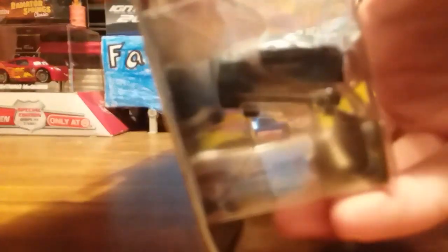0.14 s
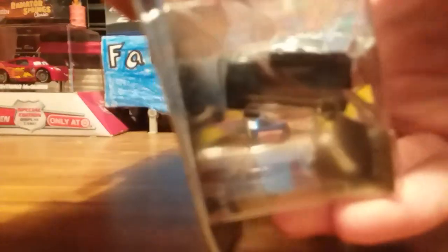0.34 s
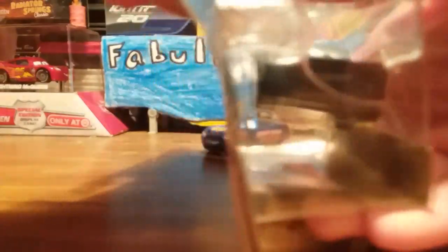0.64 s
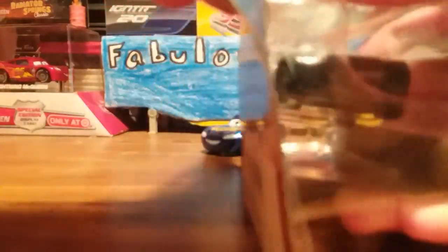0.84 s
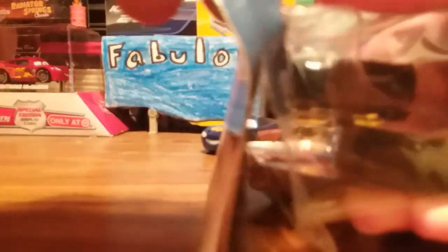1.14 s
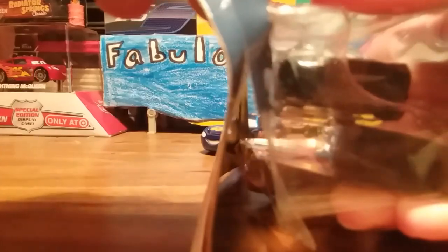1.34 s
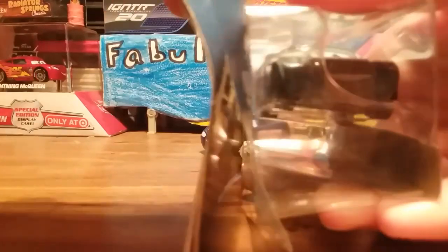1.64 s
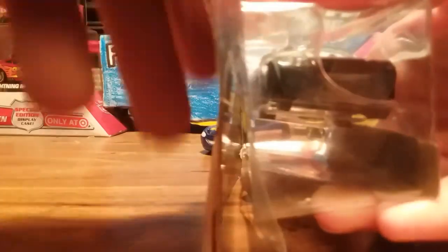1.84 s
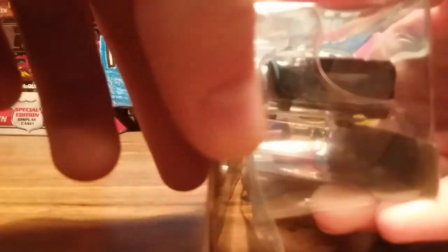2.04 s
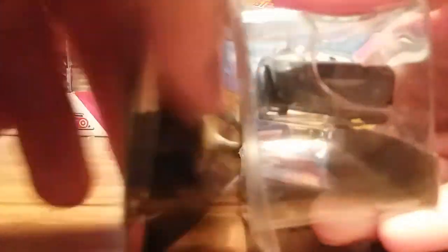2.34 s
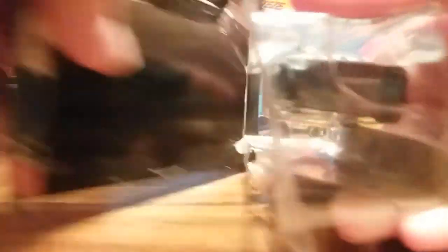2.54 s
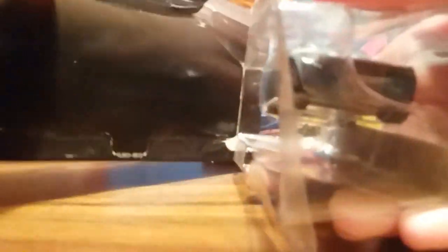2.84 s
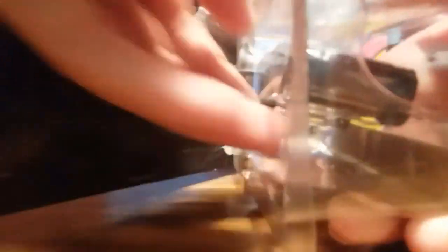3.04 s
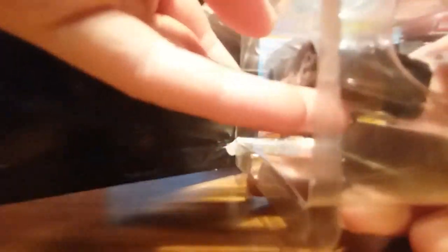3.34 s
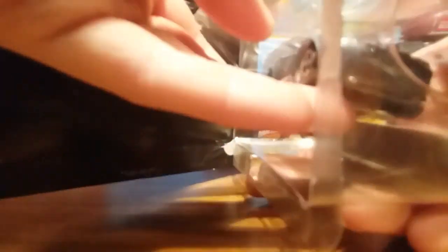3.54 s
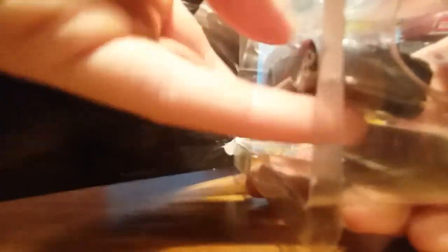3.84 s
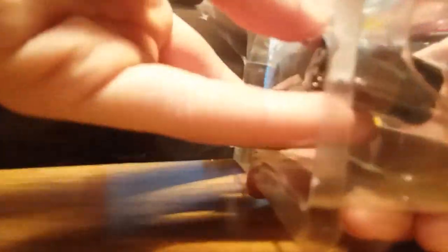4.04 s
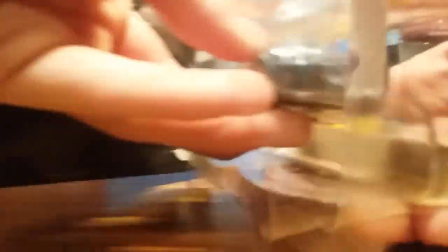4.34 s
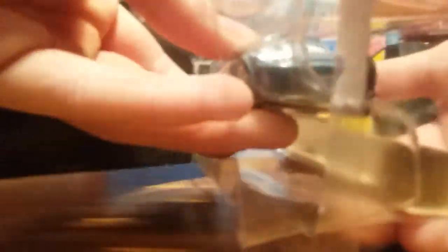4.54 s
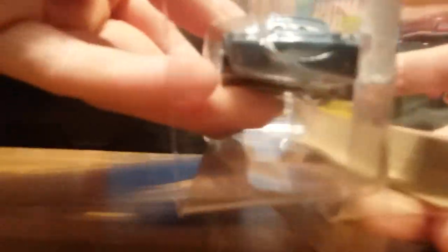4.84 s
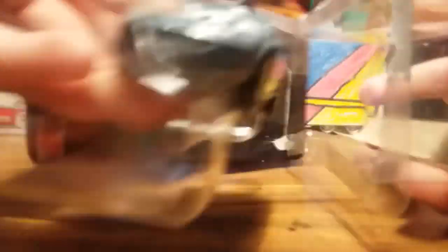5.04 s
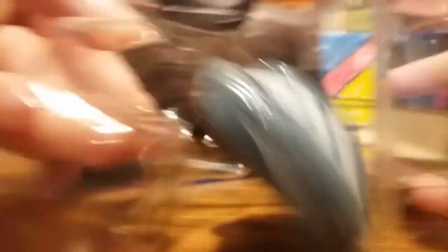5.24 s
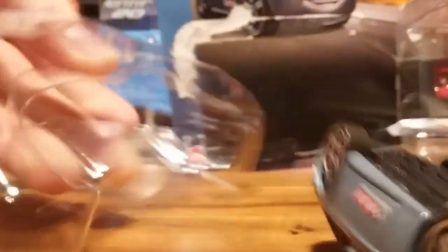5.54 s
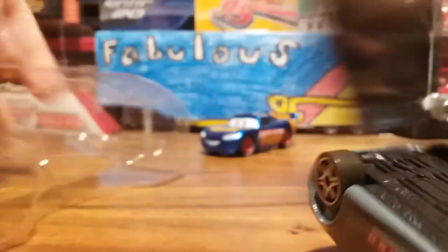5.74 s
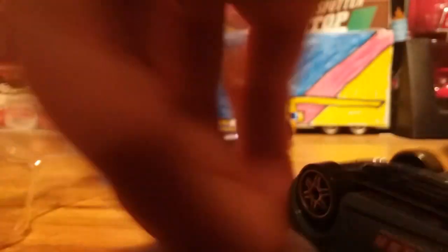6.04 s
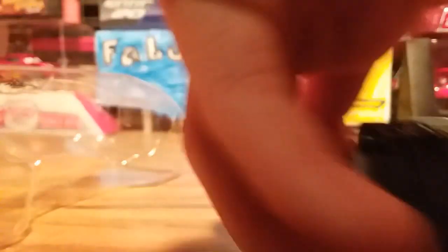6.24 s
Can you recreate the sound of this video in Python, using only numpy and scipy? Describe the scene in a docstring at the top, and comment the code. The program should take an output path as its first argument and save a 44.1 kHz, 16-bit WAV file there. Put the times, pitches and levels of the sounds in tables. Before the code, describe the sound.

Very close to a stereo microphone in a small quiet room, hands pry a stiff plastic shell from its card. Separate hollow snaps come first, then a cluster of hard pops with a tearing rasp and small squeak, a sparser stretch of light ticks, and finally a dense rattling, crinkling burst with soft table thumps before it goes quiet.

```python
"""Prying open a plastic blister pack

Hands pry a stiff plastic blister off its card, close to two microphones over a wooden table in a small room.
The shell buckles in snaps: a kick, dense decaying noise and panel notes. Random slips make card and fingers rub,
gliding and wavering sines make a rasp and squeaks, and damped sines are the bumps of pack and table.
A faint decaying-noise echo and a steady rush give the room; the loudest peaks overload the microphones."""
import sys
import numpy as np
from scipy import signal
from scipy.fft import rfft, irfft, next_fast_len
from scipy.io import wavfile
from scipy.ndimage import uniform_filter1d, map_coordinates

SR = 44100
rng = np.random.default_rng(int(sys.argv[2]) if len(sys.argv) > 2 else 0)


def master(y):
    """Save y as 16-bit WAV."""
    cut = np.clip(np.atleast_2d(y).T, -1, 1)
    pcm = np.round(cut * 32767)  # scale
    wavfile.write(sys.argv[1], SR, pcm.astype(np.int16))


N = 282240  # samples, 6.4 s

# spectrum of the flexing panels: (frequency [Hz], relative level [dB per Hz])
FLEX_SPECTRUM = [(150, -61), (330, -13), (480, -4), (650, 1.5), (790, 1), (970, 2.5), (1300, -0.5),
                 (1650, -9), (2600, -24), (6000, -72)]
# spectrum of the finest, highest crackle: (frequency [Hz], relative level [dB per Hz])
FIZZ_SPECTRUM = [(2500, -29.5), (4800, -1.5), (6000, -3.5), (7700, 2), (9000, -7.5), (10000, -11),
                 (12500, -3.5), (15500, -1.5), (17000, -14.5)]
# low handling noise and light rustle, which fall to near silence after 5.8 s:
# (time [s], low handling level [dB], light rustle level [dB])
RUSTLE_LEVELS = [(0, -44, -53), (.7, -47, -44), (1.05, -48, -50.5), (1.35, -45, -49.5), (1.58, -47.5, -45),
                 (1.85, -48, -61), (2.3, -43, -56), (2.55, -45, -60), (2.79, -51.5, -56.5),
                 (3.05, -48, -50), (3.45, -53.5, -57), (4.1, -53, -53), (4.58, -50.5, -59),
                 (5.02, -42.5, -37), (5.6, -44, -42.5), (5.78, -47.5, -51), (5.85, -52, -77.5),
                 (6.3, -66, -75), (6.4, -50, -70)]


def amp(db):
    """Decibels to amplitude."""
    return 10 ** (np.asarray(db) / 20)


def unit(x):
    """Scale to rms 1."""
    return x / np.sqrt(np.mean(x ** 2) + 1e-20)


def along(points, hz):
    """Interpolate (Hz, value) points on a log frequency axis."""
    f, v = np.transpose(points)
    return np.interp(np.log(hz + 1), np.log(f + 1), v)


def wobble(rate):
    """A smooth random curve, rate knots a second."""
    knots = rng.standard_normal(int(N * rate / SR) + 4)
    return map_coordinates(knots, [np.arange(N) * rate / SR])


def filtered(x, response):
    """x times a response of frequency."""
    m = next_fast_len(N + SR // 4)
    return irfft(rfft(x, m) * response(np.fft.rfftfreq(m, 1 / SR)), m)[..., :N]


def causal(gain):
    """The minimum-phase response with this gain: it rings only after it is struck."""
    cepstrum = irfft(np.log(np.maximum(gain, 1e-6)))
    half = len(cepstrum) // 2
    return np.exp(rfft(np.r_[cepstrum[0], 2 * cepstrum[1:half], np.zeros(half)]))


def resonance(hz, centre_hz, q):
    """One damped mode, gain 1 at its centre."""
    damping = 1j * hz * centre_hz / q
    return damping / (centre_hz ** 2 - hz ** 2 + damping)


def microphone_pair(pair, hz):
    """Two unrelated spectra become left and right, less alike in the treble."""
    # how alike the two microphones hear the sound: (frequency [Hz], likeness [0 to 1])
    likeness = [(100, 0.83), (500, 0.84), (1200, 0.46), (3000, 0.06), (12000, 0.14)]
    turn = np.arccos(np.clip(along(likeness, hz), 0, 1)) / 2
    mid, side = pair[0] * np.cos(turn), pair[1] * np.sin(turn)
    return np.array([mid + side, mid - side])


def panned(x, pan_db):
    """Lean left by pan_db at equal power."""
    gains = amp(np.array([[.5], [-.5]]) * pan_db)
    return x * gains / np.sqrt(np.mean(gains ** 2, axis=0))


def snaps(size=8192):
    """A panel flips with one broad kick, then the shell's dense modes and the panel's own notes die away."""
    # snaps and knocks of the shell, the three voices after the pitch relative to the strength of the flex:
    # (time [s], strength [dB], panel pitch [Hz], thud [dB], crack [dB], fizz [dB], lean to the left [dB])
    snap_rows = [(.171, -38, 724, -0.5, -11.5, -23, 2), (.224, -14.5, 1045, -42, -3.5, -26, 0),
                 (.255, -47, 830, -8, -4, 11, 0), (.709, -16.5, 970, -22, -14, -56, 0.5),
                 (.76, -25, 1020, -6.5, -3, -35, 0.5), (.871, -34.5, 483, -1.5, -17.5, -18, 10),
                 (.994, -21, 664, -17, 6, -8, -2), (.996, -15.5, 590, -13, -7, -23, 0.5),
                 (1.11, -13, 905, -15.5, -0.5, -34, 1), (1.136, -29, 1110, -29, 10.5, -4, -0.5),
                 (1.144, -31.5, 1010, -11, 4.5, -7, 0), (1.229, -47, 840, 9.5, 9, -6.5, -0.5),
                 (1.499, -35, 600, -8, -1.5, -14.5, -3), (1.543, -30.5, 970, -9, -9, -18, -1),
                 (1.569, -23, 840, -6.5, -6.5, -17, -5), (1.593, -27.5, 910, -21, 0.5, -24, -2),
                 (1.724, -28.5, 516, -10, -4, -13, 2), (1.747, -24.5, 534, -14, -7.5, -26, 2),
                 (2.088, -34.5, 950, 0, -6, -9, 8), (2.156, -15.5, 1120, -4, -3.5, -11, 3),
                 (2.163, -17.5, 595, -6.5, -23, -13, 1), (2.283, -28.5, 960, -4, -20, -18, 2),
                 (2.363, -26, 1050, -15, 2, -5, 1.5), (2.377, -16.5, 1040, -12, -12.5, -33, 3.5),
                 (2.434, -21, 1060, -8, -14, -12, 1), (2.449, -12.5, 925, -7.5, -4.5, -13.5, 0.5),
                 (2.479, -14.5, 1040, -5, -1, -14, 0), (2.488, -23, 1040, -6, 5.5, -27, 15),
                 (2.494, -18, 1300, 1.5, 1, -36, 0.5), (2.533, -31, 716, -14, 1, -24, 1),
                 (2.86, -38.5, 1140, -1, -6, -29, 4), (2.924, -19.5, 1280, -26.5, 2.5, -8, 1.5),
                 (3.009, -32, 1250, -6, -10, -17, 9), (3.019, -28.5, 770, -14, -1.5, -30, 4),
                 (3.175, -39, 1070, -13, -5, -26, 7), (3.256, -34.5, 1190, -9, -3, 6, 22),
                 (3.263, -27.5, 1240, -21, -0.5, 2, 2), (3.31, -30.5, 1230, -25, -1.5, -3.5, 2.5),
                 (3.36, -46, 1500, -13, 7.5, 0.5, 3), (3.386, -29, 1120, -21, -1, -8.5, 2.5),
                 (3.495, -28, 1180, -30, -0.5, -2.5, 4), (3.636, -33.5, 1150, -24, -4.5, -11, 3),
                 (3.655, -15.5, 1274, -17, -5.5, -9, 0.5), (3.768, -37.5, 1320, 2, 1, -16, 3),
                 (3.81, -45, 1210, -1, 2.5, -7.5, 3), (3.939, -37.5, 1190, -17, -20, -36, 5),
                 (4.116, -35.5, 1360, -38, -9.5, -46, 8), (4.168, -20, 1320, -31, 1, -20.5, 4.5),
                 (4.2, -17.5, 1056, -33, -6.5, -8, 2.5), (4.415, -34, 980, -40, 5.5, -5.5, 1),
                 (4.453, -29, 940, -8, -1, -6, 2), (4.595, -31.5, 1550, -7.5, -2, -29, 5),
                 (4.7, -23, 1210, -11, -8, -17.5, 7.5), (4.722, -21, 835, -17, -5.5, -20.5, 1.5),
                 (4.732, -21.5, 1210, -10.5, -12, -28, 9), (4.853, -30, 1190, -23.5, -3, -42, 4),
                 (4.865, -26.5, 990, -13, -9.5, -38, 6), (4.921, -13.5, 1110, -3.5, -8, -31.5, 2),
                 (4.927, -17.5, 470, -12.5, 6, -21, 5.5), (4.936, -16.5, 490, -4.5, -12, -35, 13.5),
                 (4.975, -22, 1000, -1.5, -3, -17, 2), (5.01, -27, 1480, 2.5, 2, -12.5, 4),
                 (5.114, -33.5, 1500, 4.5, 11.5, 5.5, 0.5), (5.13, -13.5, 585, -1, -23.5, -45, 5.5),
                 (5.139, -18.5, 710, -5, -22, -33, -4), (5.159, -34.5, 560, 12, 3, -20, -2),
                 (5.172, -21, 1570, -10.5, -5.5, -22, 10), (5.208, -20, 1460, -4.5, 4, -16.5, 4),
                 (5.222, -20.5, 1040, -9, -2, -24.5, -8), (5.238, -29.5, 487, 7.5, 10.5, 11, -0.5),
                 (5.264, -30, 482, 11.5, 7, 6, -2), (5.33, -14, 568, -6, -5, -16.5, 6),
                 (5.354, -18.5, 1460, -3.5, 3, -7, -1), (5.362, -18.5, 626, 1, 0.5, -8, -1),
                 (5.375, -20, 550, -5.5, 2, -9.5, -2), (5.398, -23.5, 1030, -7, 7, 0, 0.5),
                 (5.425, -16, 580, -2, -3, -18, 1), (5.472, -14.5, 554, -8, -1, -27, 0),
                 (5.494, -21.5, 580, -3, 7.5, -8.5, -1.5), (5.507, -21.5, 600, -0.5, 0, -30, 2),
                 (5.521, -28.5, 600, 0.5, 0, -25, 2), (5.532, -29, 890, 2.5, 3.5, -10, 1),
                 (5.614, -50.5, 1400, 3, 17.5, 1.5, 8), (5.669, -35.5, 480, -20, 3, -9.5, 15),
                 (5.786, -40, 700, 3, -30, -42, 0), (6.054, -54, 520, 0, 9.5, -11, -5),
                 (6.065, -32.5, 563, -8, -4.5, -33, 1), (6.093, -27.5, 505, -4, 11, -7.5, -1.5),
                 (6.103, -26, 490, 0.5, 8.5, -20, -1.5), (6.112, -22, 488, -8.5, -8, -22, -1),
                 (6.163, -50.5, 520, -20, 14.5, -3, 1), (6.245, -68.5, 500, -4, 18.5, 12, 0),
                 (6.345, -51.5, 490, 15, 22, 19, 0.5)]
    # modes of the whole blister, common to every snap: (frequency [Hz], Q, level [dB])
    shell_modes = [(308, 39, -2.5), (480, 24, -3.5), (573, 48, -13.5), (951, 28, -8.5), (1913, 44, -3),
                   (3500, 24, -3)]
    # spectrum of the deep knock: (frequency [Hz], relative level [dB per Hz])
    thud_spectrum = [(20, -39), (60, -17.5), (130, -3.5), (300, 0), (400, -7.5), (560, -6.5), (1200, -56.5)]
    # spectrum of the sharp crack: (frequency [Hz], relative level [dB per Hz])
    crack_spectrum = [(600, -28.5), (1300, -8.5), (1750, 3), (2200, 0.5), (2600, 2.5), (3000, -3),
                      (4000, -14), (5300, -18), (7000, -25.5), (12000, -59.5)]

    out = np.zeros((2, N + size))
    t, hz = np.arange(size) / SR, np.fft.rfftfreq(size, 1 / SR)
    shell = 1 + sum(amp(db) * resonance(hz, mode_hz, q) for mode_hz, q, db in shell_modes)
    spectra = (thud_spectrum, FLEX_SPECTRUM, crack_spectrum, FIZZ_SPECTRUM)
    thud, flex, crack, fizz = (shell * causal(amp(along(points, hz))) for points in spectra)

    def burst(colour, note, t60, kick):
        """One voice of a snap; kick weighs the first jolt against the ringing."""
        decay = amp(-60 * t / t60) + amp(-25 - 60 * t / .075)
        fade = decay * (1 - np.exp(-t / .0005))
        modes = microphone_pair(rfft(unit(rng.standard_normal((2, size)) * fade)), hz)
        jolt = np.sqrt(size) * np.exp(-2j * np.pi * hz * .0005)  # a pulse at 0.5 ms
        ring = unit(irfft((modes + .8 * kick * jolt) * colour * note))
        wave = ring + .6 * kick * unit(irfft(jolt * colour))
        # each side has the energy of rms 1 over 10 ms
        return wave * np.sqrt(SR / 100 / np.sum(wave ** 2, axis=1, keepdims=True))

    for s, flex_db, pitch_hz, thud_db, crack_db, fizz_db, pan_db in list(snap_rows) + ticks():
        # the more of the shell a snap moves (its thud), the longer it rings: doubled every 20 dB
        t60 = min(0.087 * 2 ** (thud_db / 20), 0.12)
        # a blunt snap rings the wide rim, a sharp one the narrow edge;
        # both ring alike where fizz minus crack is -18 dB
        rim_hz, edge_hz = np.array([2183, 3980]) * np.exp(0.077 * rng.standard_normal(2))
        edge_db = 0.68 * (fizz_db - crack_db + 18)
        edge = amp(edge_db) * resonance(hz, edge_hz, q=7.9)
        panel = 0.11 + resonance(hz, pitch_hz, q=6)
        rim = 0.22 + resonance(hz, rim_hz, q=10) + edge
        # the higher the voice, the sooner it dies
        low = amp(thud_db) * burst(thud, 1, t60 * 1.2, kick=.6)
        low += burst(flex, panel, t60 * .85, kick=.9)
        low += amp(crack_db) * burst(crack, rim, t60 * .55, kick=.7)
        high = amp(fizz_db) * burst(fizz, 1, t60 * .3, kick=.2)
        # the hand shades the treble most
        both = amp(-0.83) * panned(low, pan_db) + panned(high, 3.3 * pan_db + 5.0)
        out[:, round(s * SR):][:, :size] += amp(flex_db) * both
    return out[:, :N]


def ticks(count=36):
    """Faint ticks of the flexing shell at random moments, following the rustle's level; rows as for snaps."""
    s, _, rustle_db = np.transpose(RUSTLE_LEVELS)
    times = rng.uniform(0, N / SR - .01, count)
    chance = np.clip(rng.standard_normal((count, 3)), -2, 2)
    rows = []
    for t, (size, pitch, side) in zip(times, chance):
        strength_db = np.interp(t, s, rustle_db) + 4 + 0.5 * size
        pitch_hz = 960 * np.exp(.25 * pitch)
        rows.append((t, strength_db, pitch_hz, -9.5, -3, -20.5, 3 * side))  # thud, crack, fizz, lean
    return rows


def rubbing():
    """Card tears off the flange and fingers drag over the plastic: random slips sound broad spectra."""
    # spectrum of the hands moving the pack: (frequency [Hz], relative level [dB per Hz])
    handling_spectrum = [(20, -31), (60, -10.5), (120, 3), (190, -4), (300, 2), (400, -1), (560, -3),
                         (1200, -65.5)]
    # spectrum of scraped card and plastic: (frequency [Hz], relative level [dB per Hz])
    scrape_spectrum = [(600, -32.5), (1300, -9), (1750, 0), (2200, 0.5), (2600, -2.5), (3050, -7),
                       (4200, -11), (5300, -16.5), (7000, -21), (12000, -57.5)]

    handling_db, flex_db, scrape_db, fizz_db, pan_db = effort()
    catch_db = 3.3 * wobble(70)  # the grip sticks and gives
    crinkle = slips(rate=70, spread_db=3.5)
    low = amp(handling_db - 3.5) * grains(handling_spectrum, rate=150, spread_db=2.0, smooth=0.98)
    # each small crinkle sounds in all the upper voices at once
    creak = grains(FLEX_SPECTRUM, rate=400, spread_db=5, smooth=.5, crinkle=.7 * crinkle)
    creak = patchy(creak, depth_db=3.5)
    scrape = grains(scrape_spectrum, rate=800, spread_db=4.5, smooth=.7, crinkle=.65 * crinkle)
    scrape = patchy(scrape, depth_db=3.2)
    fibres = grains(FIZZ_SPECTRUM, rate=2000, spread_db=4, smooth=1.1, crinkle=.2 * crinkle)
    body = amp(flex_db + catch_db - 2.24) * creak + amp(scrape_db + catch_db + 1.5) * scrape
    high = amp(fizz_db + catch_db - 3.34) * fibres
    return low + panned(body, pan_db) + panned(high, 1.3 * pan_db + 5.5)


def effort():
    """Levels (handling, flex, scrape, fizz) and lean in dB: slowly changing handling and rustle plus strokes."""
    # pulls on the card and drags of the fingers, the three voices after the strength relative to it:
    # (time [s], length [s], strength [dB], shake [dB], scrape [dB], fizz [dB], lean to the left [dB])
    stroke_rows = [(.25, 0.034, -50.5, -2, -8, -13, 1), (0.447, .06, -42, -3, -5.5, -16, -2.5),
                   (0.577, 0.059, -34.5, -5.5, -12, -34, -1.5), (0.702, 0.11, -45, -4, -5, -16.5, 1),
                   (0.865, 0.096, -40, -0.5, -7.5, -2, -2), (0.987, 0.013, -28, -5, 0.5, -1.5, -4.5),
                   (1.021, 0.13, -42, 0, -1.5, -2.5, 0.5), (1.526, 0.11, -38.5, 1, -5, -10.5, 0.5),
                   (1.732, 0.016, -37.5, 6.5, -13, -12, -11), (1.837, 0.12, -53.5, -4, -6.5, -5, -0.5),
                   (2.084, 0.066, -31, -6, -0.5, -5.5, 0), (2.154, 0.074, -24.5, -3.5, -3, 0, 1.5),
                   (2.29, 0.045, -31.5, -5.5, -6, -6.5, 2.5), (2.434, 0.06, -21.5, -8, -4, -6.5, 0.5),
                   (2.48, .027, -23.5, -22, -7, -16, -1), (2.646, 0.099, -44, 1.5, -7, -5.5, 3.5),
                   (2.867, .025, -44, 2, -7.5, -17, 3), (3.026, 0.019, -39.5, 2, -8.5, -13.5, 3),
                   (3.152, 0.094, -46, -14, -8.5, -14.5, 5), (3.659, 0.011, -35, -6, -3, -6, 1),
                   (4.202, 0.11, -39, -4.5, -5, -15, 3), (4.407, 0.031, -43, -4, -9, -18, 5),
                   (4.692, 0.053, -27.5, -8.5, -11.5, -20.5, 1), (4.921, 0.015, -17, -6.5, -7.5, -18.5, 0),
                   (5.05, 0.056, -37.5, -8.5, 3.5, 0.5, 4), (5.139, 0.09, -28.5, -9, -3, -11, 1.5),
                   (5.242, .04, -32, 1.5, 6, 2.5, 1.5), (5.336, 0.041, -23.5, -8.5, -5.5, -11, -2.5),
                   (5.429, 0.01, -21.5, -3.5, -9.5, -11.5, -2.5), (5.495, 0.051, -29, -19, -3, -8, 0),
                   (5.666, 0.08, -36, -10, -9, -18, 1), (6.101, 0.01, -31, -25, -5, -9.5, 4.5),
                   (6.336, 0.025, -62.5, -4, 24.5, 26, -3)]
    attack_s, release_s = 0.013, 0.017  # time constants before and after each stroke

    t = np.arange(N) / SR
    s, *columns = np.transpose(RUSTLE_LEVELS)
    handling, rustle = (amp(np.interp(t, s, c)) ** 2 for c in columns)
    # scrape and fizz lie below the light rustle
    power = np.array([handling, rustle, rustle * amp(-10.5) ** 2, rustle * amp(-14) ** 2])
    lean = np.zeros(N)
    for start, length, db, shake_db, scrape_db, fizz_db, pan_db in stroke_rows:
        # each stroke swells, holds and dies away
        away = np.maximum((start - t) / attack_s, (t - start - length) / release_s)
        near = away < 10
        stroke = (amp(db) * np.exp(-np.maximum(away[near], 0))) ** 2
        power[:, near] += amp([[shake_db], [0], [scrape_db], [fizz_db]]) ** 2 * stroke
        lean[near] += pan_db * stroke
    return *(10 * np.log10(power)), lean / power[1]


def slips(rate, spread_db):
    """Kicks of random size at random moments, rate a second on average, rms 1."""
    signs = (rng.random((2, N)) < rate / SR) * rng.choice([-1, 1], (2, N))
    return unit(signs * amp(spread_db * np.clip(rng.standard_normal((2, N)), -2, 2)))


def grains(colour, rate, spread_db, smooth, crinkle=0):
    """Tiny slips over a smooth rub of noise, coloured by a spectrum, rms 1."""
    drive = slips(rate, spread_db) + smooth * rng.standard_normal((2, N)) + crinkle
    hz = np.fft.rfftfreq(N, 1 / SR)
    spectra = microphone_pair(rfft(drive), hz)
    return unit(irfft(spectra * causal(amp(along(colour, hz))), N))


def patchy(x, depth_db):
    """The shell's resonances shift as it bends: random patches of time and pitch swell or fade."""
    z = signal.stft(x, nperseg=1024)[2]
    field = uniform_filter1d(rng.standard_normal(z.shape[1:]), size=4, axis=0)
    field = uniform_filter1d(field, size=7, axis=1)
    return unit(signal.istft(z * amp(depth_db * unit(field)), nperseg=1024)[1][:, :N])


def zipping():
    """A strip of card zips off the flange: nearly regular slips blur into a thin rising rasp."""
    # the strip slips faster and faster: (time [s], slip rate [Hz], level [dB])
    zip_path = [(2.17, 6600, -60), (2.19, 6700, -29), (2.21, 7100, -42), (2.231, 8000, -32.5),
                (2.25, 8300, -76)]
    s, hz, db = np.transpose(zip_path)
    t = np.arange(N) / SR
    rate = np.interp(t, s, hz) * (1 + 0.039 * np.array([wobble(2500), wobble(2500)]))
    level = amp(np.interp(t, s, db, left=-120, right=-120))
    return level * np.sin(2 * np.pi * np.cumsum(rate, axis=1) / SR)


def squeaking():
    """Plastic sticks and slips at a panel's own note: a short wavering sine that swells and fades."""
    # squeaks: (time [s], length [s], pitch [Hz], level [dB])
    squeak_rows = [(2.086, 0.044, 950, -24.5), (3.621, 0.031, 1130, -35)]
    out = np.zeros(N)
    for s, length, hz, db in squeak_rows:
        size = round(length * SR)
        pitch = hz * (1 + .06 * wobble(300)[:size])
        swell = np.sqrt(2) * np.sin(np.pi * np.arange(size) / size)
        out[round(s * SR):][:size] += amp(db) * swell * np.sin(2 * np.pi * np.cumsum(pitch) / SR)
    return out


def bumps():
    """The hands bump the pack and the table: soft, deep damped sines that last a few cycles."""
    # bumps: (time [s], relative level [dB], frequency [Hz])
    bump_rows = [(2.497, -18.5, 112), (2.504, -30, 58), (3.656, -31.5, 62.4), (4.924, -24, 75),
                 (4.984, -26, 86), (5.155, -19, 106), (5.241, -21, 116.2), (5.358, -13.5, 62.4)]
    out, t = np.zeros(N + SR), np.arange(SR // 4) / SR
    for s, db, hz in bump_rows:
        envelope = amp(db + 6.5 - 60 * t / 0.085) * (1 - np.exp(-t / 0.013))
        out[round(s * SR):][:len(t)] += envelope * np.sin(2 * np.pi * hz * t)
    return panned(out[:N], pan_db=10.0)


def room(x):
    """The walls' answer: a tail of decaying noise 4.6 ms behind the pack."""
    # decay of the small room: (frequency [Hz], time to fall 60 dB [s])
    decay_times = [(150, 0.35), (1500, 0.16), (12000, 0.31)]
    hz, t, z = signal.stft(rng.standard_normal((2, SR // 3)), SR, nperseg=256)
    fade = amp(-60 * t / along(decay_times, hz)[:, None])
    tail = signal.istft(z * fade, SR, nperseg=256)[1]
    tail = np.pad(tail, ((0, 0), (round(0.0046 * SR), 0)))
    return signal.fftconvolve(x, tail / np.linalg.norm(tail[0]), axes=1)[:, :N]


def room_tone():
    """The still room's faint rush: steady coloured noise."""
    # spectrum of the still room: (frequency [Hz], relative level [dB per Hz])
    tone_spectrum = [(18, -53.5), (30, -48), (121, 0), (239, -22), (437, -3), (760, -16.5), (889, -12.5),
                     (1670, -43), (4300, -53.5), (14800, -42), (16000, -66.5)]
    return amp(-63) * grains(tone_spectrum, rate=500, spread_db=0.5, smooth=6.8)


def scene():
    """The pack close to the two microphones, the room's answer, the bumps and the still room."""
    pack = snaps() + rubbing() + zipping() + squeaking()
    # the left microphone hears the pack 0.17 ms before the right one
    sides = np.array([[1], [-1]])
    pack = filtered(pack, lambda hz: np.exp(1j * np.pi * hz * .00017 * sides))
    return pack + amp(-21) * room(pack) + bumps() + room_tone()


def record(dry):
    """The microphones clip at full scale, then a steep low-pass takes off the top."""
    top_hz = 16050
    clipped = np.clip(dry, -1, 1)
    return filtered(clipped, lambda hz: 1 / (1 + (hz / top_hz) ** 120))


dry = scene()
out = record(dry)
master(out)
```